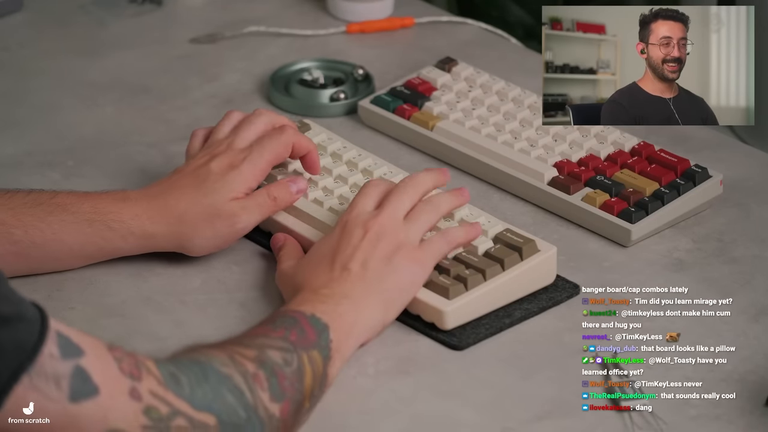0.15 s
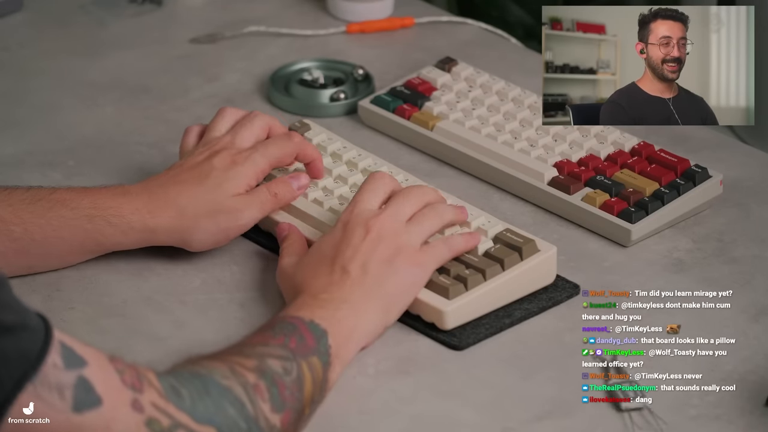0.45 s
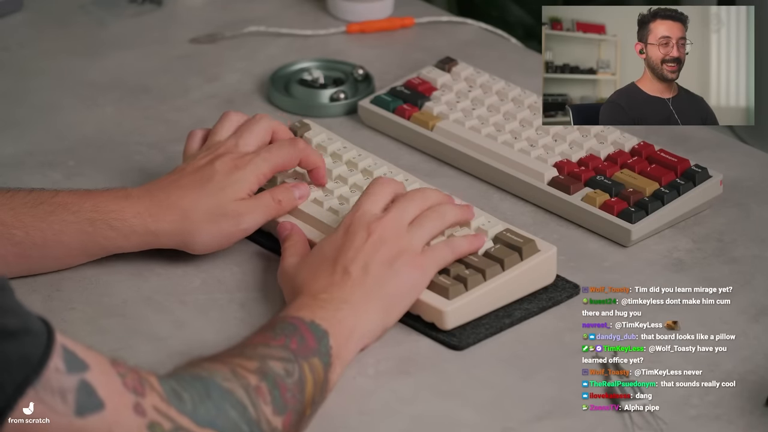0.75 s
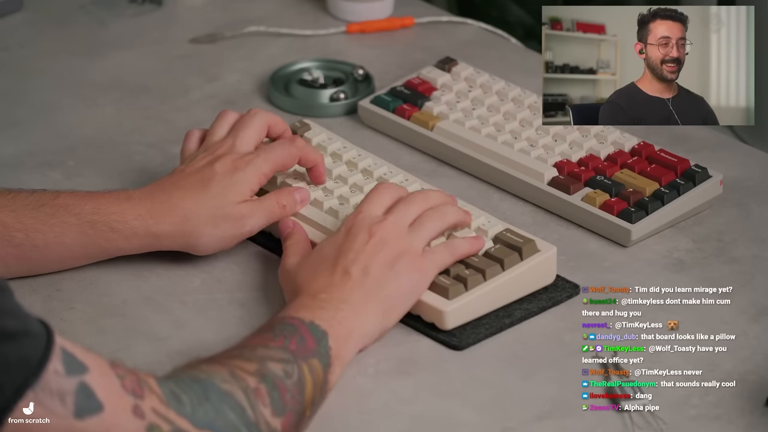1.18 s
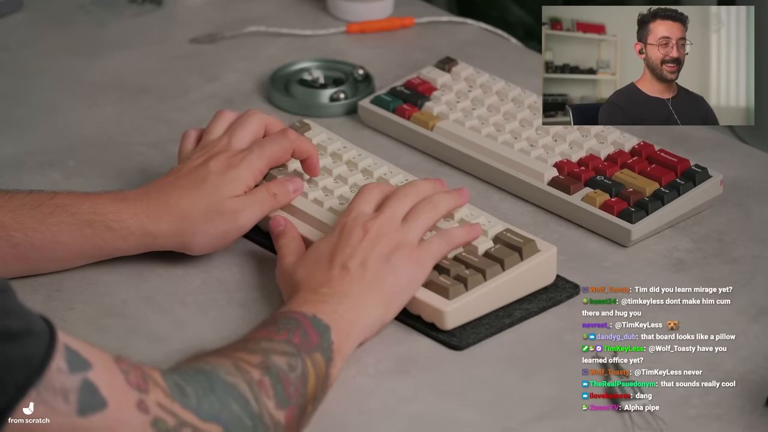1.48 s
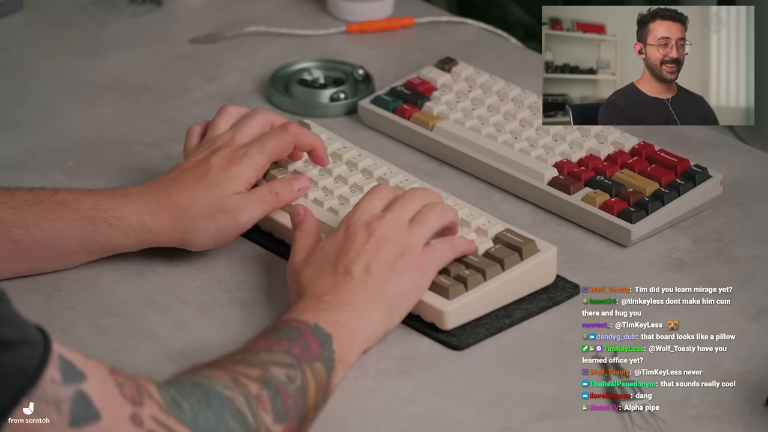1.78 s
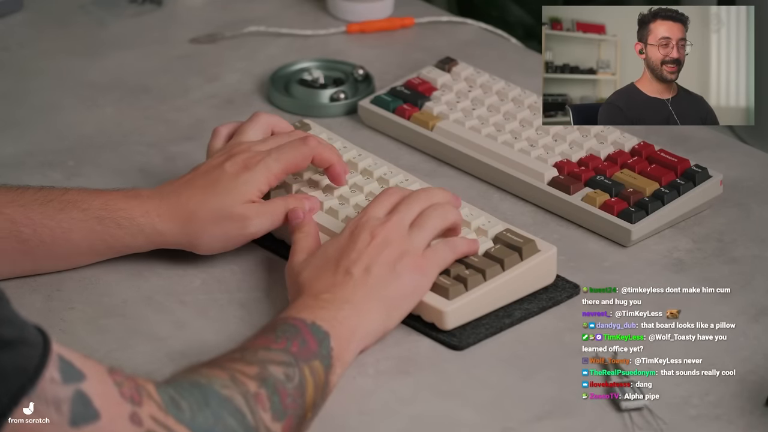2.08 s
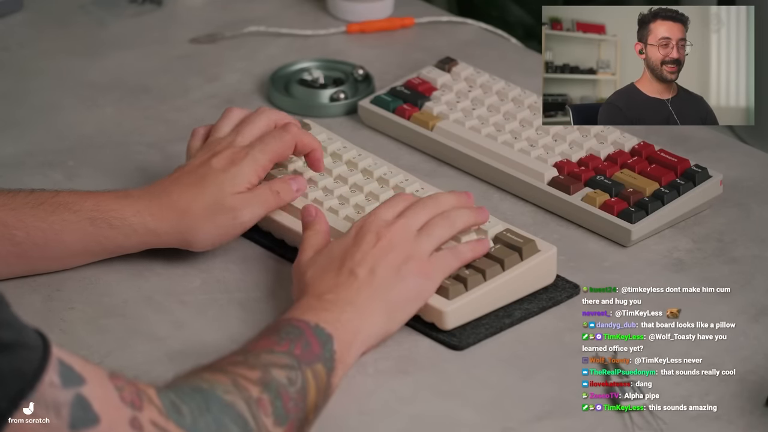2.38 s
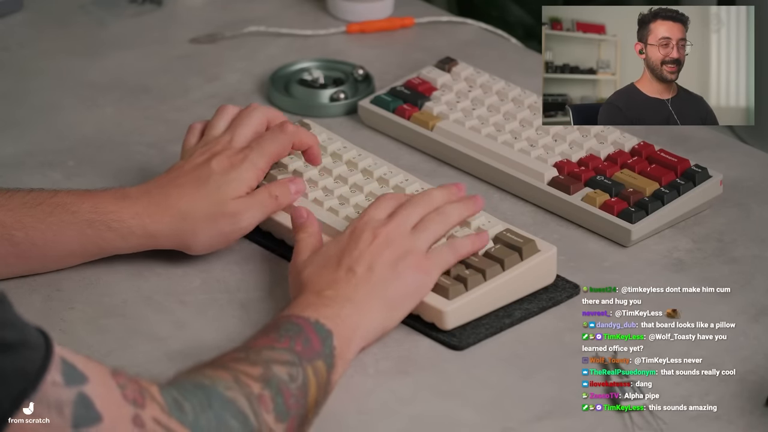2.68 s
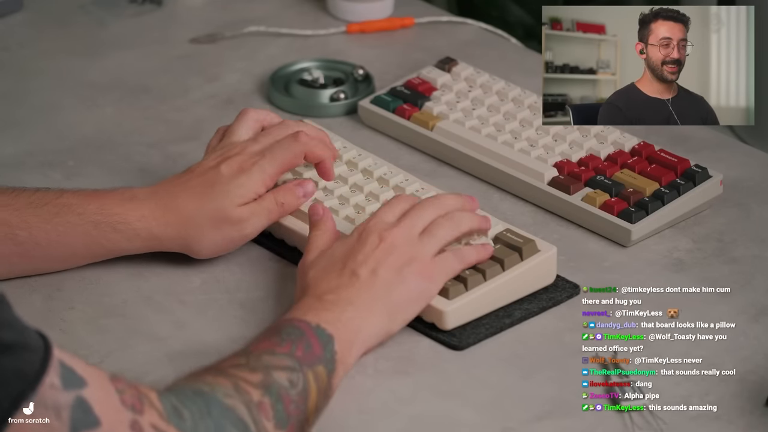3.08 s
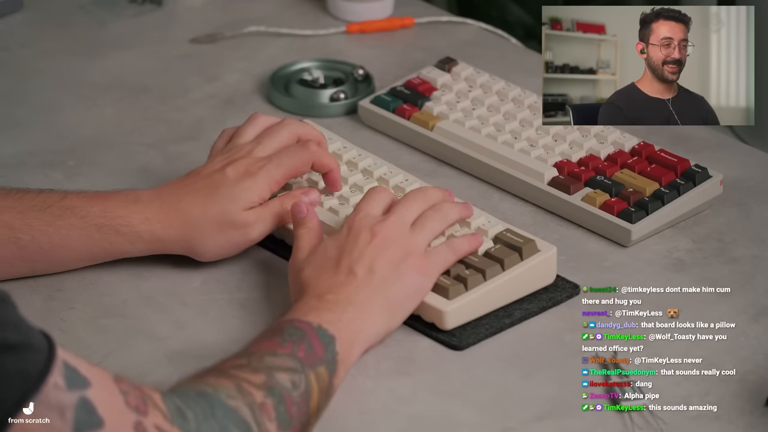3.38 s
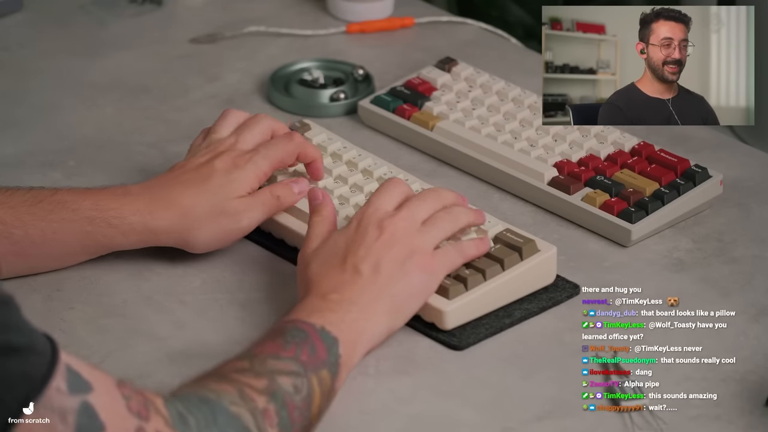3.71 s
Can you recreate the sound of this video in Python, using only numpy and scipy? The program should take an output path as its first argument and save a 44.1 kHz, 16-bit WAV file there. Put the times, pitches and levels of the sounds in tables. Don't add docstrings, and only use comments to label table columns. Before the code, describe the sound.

Mechanical keyboard typing runs from the start at about sixteen strokes a second, bright short clacks of varying strength. Deeper, longer spacebar thocks come every few tenths of a second, strong near 0.95, with low desk thumps beneath. Around 2.1-2.35 seconds it thins to faint ticks, then dense typing resumes until about 3.8. Close microphone, small hard room, short reverberation, quiet low ventilation rumble.

```python
import sys
import numpy as np
from scipy import signal
from scipy.io import wavfile

SR = 44100
rng = np.random.default_rng(int(sys.argv[2]) if len(sys.argv) > 2 else 0)


def magnitude_from_level(level_db):
    exponent = np.asarray(level_db, float) / 20
    return 10 ** exponent


def digitize_waveform(pressure):
    field = np.atleast_2d(pressure).T
    bounded = np.clip(field, -1, 1)
    quanta = np.round(bounded * 32767).astype(np.int16)
    wavfile.write(sys.argv[1], SR, quanta)


N = 169785


def at_hz(points, hz):
    table_hz, value = np.transpose(points)
    return np.interp(np.log(hz), np.log(table_hz), value)


def bands(length, gain):
    edges = 22 * 2 ** np.arange(0, 10, .5)
    white = rng.standard_normal((2, length + SR))
    total = 0
    for k, (low, high) in enumerate(zip(edges, edges[1:])):
        sos = signal.butter(2, [low, high], "band", fs=SR, output="sos")
        band = signal.sosfilt(sos, white[k % 2])[SR:]
        total = total + gain(np.sqrt(low * high)) * band
    return total


def blows(s, db, modes, scale_hz=1, seconds=.04, rise=.0005, spread_db=2.0, way=1):
    detune = .006
    t = np.arange(int(seconds * SR)) / SR
    luck = rng.standard_normal((len(s), 2, len(modes)))
    wave = 0
    for k, (hz, level, t60) in enumerate(modes):
        strength = magnitude_from_level(level + spread_db * luck[:, 0, k])
        pitch = hz * scale_hz * (1 + detune * spread_db * luck[:, 1, k])
        decay = magnitude_from_level(-60 * t / t60)
        wave = wave + strength[:, None] * decay * np.sin(2 * np.pi * pitch[:, None] * t)
    wave = wave * (1 - np.exp(-t / rise))
    wave = wave * (way * magnitude_from_level(db) / np.abs(wave).max(axis=1))[:, None]
    out = np.zeros(N + SR)
    start = (s * SR).astype(int)
    np.add.at(out, start[:, None] + np.arange(len(t)), wave)
    return out[:N]


def radiate(x, low_hz):
    return signal.sosfilt(signal.butter(4, low_hz, "high", fs=SR, output="sos"), x)


# (frequency [Hz], level [dB])
RUMBLE_SPECTRUM = [(25, -37), (55, -0.5), (90, -4.5), (200, -6), (370, -21.5), (800, -24.5), (3000, -26),
                   (15000, -46.5)]


def rumble():
    rumble_db = -55
    air = bands(N, lambda hz: magnitude_from_level(at_hz(RUMBLE_SPECTRUM, hz)))
    return magnitude_from_level(rumble_db) * air / np.std(air)


# (frequency [Hz], reverberation time [s])
ROOM_T60 = [(500, 0.49), (2000, 0.42), (5000, 0.28), (15000, 0.37)]
# (frequency [Hz], level [dB])
ROOM_COLOUR = [(500, 4), (1500, 2), (3000, 1), (4500, 4), (7000, 3.5), (10000, -2), (13000, -1.5),
               (16000, -6)]
# (delay [s], level [dB])
ECHOES = [(0.012, -18), (0.015, -22), (0.025, -32), (0.027, -25), (0.034, -34), (.0472, -26)]


def room(x):
    tail_db, tail_rise_s = -13.5, 0.0081
    smear_s, clean = .0012, 7.0
    t = np.arange(SR // 2) / SR
    tail = bands(len(t), lambda hz: magnitude_from_level(at_hz(ROOM_COLOUR, hz) - 60 * t / at_hz(ROOM_T60, hz)))
    tail = tail * (1 - np.exp(-(t / tail_rise_s) ** 3))
    response = magnitude_from_level(tail_db) * tail / np.sqrt(np.sum(tail ** 2))
    grit = rng.standard_normal(len(t)) * (rng.random(len(t)) < .1)
    for delay, db in ECHOES:
        puff = (t > delay) * np.exp(-np.abs(t - delay) / smear_s) * grit
        puff[int(delay * SR)] = clean
        response = response + magnitude_from_level(db) * puff / np.sqrt(np.sum(puff ** 2))
    return signal.fftconvolve(x, response)[:N]


# (frequency [Hz], level [dB], t60 [s])
DESK_MODES = [(119, 0, .4)]
# (time [s], strength [1/1000])
PUSHES = [(0.045, -10.5), (0.1501, -5.5), (0.206, 4.5), (0.2687, -8), (0.3309, -6), (0.4082, -5.5),
          (0.457, -3), (0.5131, -1.5), (0.5711, -4), (0.64, -0.7), (0.71, -5), (0.7685, -8), (0.8276, -5.5),
          (0.874, 2.5), (0.9292, 3.9), (0.9538, -12), (1.0327, -5.5), (1.09, 0), (1.152, -6.5),
          (1.2283, -10), (1.2801, -5), (1.3334, -4), (1.407, 1.6), (1.4743, -4), (1.5294, -0.2),
          (1.599, -5), (1.6618, -6), (1.719, -3), (1.7526, -2.2), (1.8163, 5.5), (1.8626, -6), (1.9337, 3),
          (1.995, -6), (2.1119, -10), (2.3688, 0), (2.4081, -6.1), (2.4873, -7.5), (2.5338, -6),
          (2.592, -0.6), (2.6568, -7.5), (2.7143, -1.5), (2.7816, -5.9), (2.8338, -7), (2.9114, -5.5),
          (2.94, 0.5), (2.9932, 1.8), (3.0261, -9.5), (3.1045, -2), (3.1548, 0.5), (3.169, -7),
          (3.2358, -4.5), (3.323, -6.5), (3.4389, -6.5), (3.496, 1), (3.5533, -4), (3.604, -7),
          (3.6687, -3), (3.73, -3.5), (3.7768, -0.5), (3.8074, -3.5)]


def desk():
    s, push = np.transpose(PUSHES)
    db, way = 20 * np.log10(np.abs(push) + .01), np.sign(push)
    hum = blows(s, db - 61, DESK_MODES, seconds=.5, rise=.002, way=way)
    upper_modes = [(184, -2.5, 0.13), (231.5, -6.5, 0.11)]
    upper = blows(s + 0.0012, db - 69, upper_modes, seconds=.2, rise=0.006, way=way)
    return hum + upper


# (frequency [Hz], level [dB], t60 [s])
CASE_MODES = [(200, -5, 0.058), (240, -3, 0.065), (278.6, -2.5, 0.084), (360, -4, 0.047),
              (438, -8.5, 0.049)]
# (time [s], peak level [dB], brightness [dB], case knock [dB])
BAR_STROKES = [(0.044, -16.5, -7, -3), (0.3306, -17, -12, -3.5), (0.7692, -16.5, -12.5, 0),
               (0.9545, -13.5, -6, 1.5), (1.2286, -15, -10, -0.5), (1.661, -17, -10, -1),
               (2.1115, -18, -10.5, -3), (2.4875, -16, -12, -4.5), (2.8346, -17, -14.5, -2.5),
               (3.0269, -16, -8, -1), (3.323, -16, -9, -1.5), (3.6052, -16, -14.5, -2)]


def case_knock():
    strokes = np.array(BAR_STROKES)
    return blows(strokes[:, 0], strokes[:, 3] - 41, CASE_MODES, seconds=0.089, rise=0.0018)


# (multiple of pitch [1], level [dB], t60 [s])
STEM_MODES = [(1.05, 1.5, 0.0029), (.88, -6.5, 0.0028), (.68, -4.5, 0.003), (1.12, -4.5, 0.0021),
              (1.25, -6, 0.0019)]
STEM_DB = -1
# (frequency [Hz], level [dB], t60 [s])
SNAP_MODES = [(14150, 0, 0.0013), (15800, -1, 0.0011)]
# (frequency [Hz], level [dB], t60 [s])
BAR_MODES = [(986, -14, 0.022), (1202, -13, 0.017), (1364, -2.5, 0.02), (1478, -4.5, 0.017),
             (1716, 4.5, 0.017), (1854, 3, 0.013), (2240, -4, 0.009), (2440, -7, 0.0081),
             (2950, -7.5, 0.014), (3454, -5, .013), (3740, -10, .013), (3874, -11, 0.019), (4256, -5, .016),
             (4840, -3.5, 0.015)]


def bar():
    s, db, bright, _ = np.transpose(BAR_STROKES)
    crack = blows(s, db + 0.93, [(2700, 0, 0.0013)], rise=0.00021)
    snap = blows(s, db - 20.5, SNAP_MODES)
    ring = blows(s, db - 6, BAR_MODES, rise=0.0022, spread_db=1.64)
    stem = blows(s, db + bright + STEM_DB, STEM_MODES, 6930, rise=.0001)
    return crack + snap + ring + stem


# (multiple of pitch [1], level [dB], t60 [s])
CAP_MODES = [(1.03, 5.5, 0.0052), (1.14, -8.5, 0.0027), (.88, -5, 0.0067), (1.27, -9, 0.0035),
             (1.47, -14, 0.0067)]
# (frequency [Hz], level [dB], t60 [s])
PLATE_MODES = [(871, -2, 0.0094), (1213, -8.5, 0.012), (1780, -6, 0.018), (4700, 5, 0.0074)]


def strike_caps(s, db, cap_hz, bright, stem_hz):
    hit = blows(s, db - 0.27, CAP_MODES, cap_hz)
    hit = hit + blows(s, db + bright + STEM_DB, STEM_MODES, stem_hz, rise=0.00076)
    hit = hit + blows(s, db - 16, PLATE_MODES, spread_db=6.0)
    hit = hit + blows(s, db - 15.5, SNAP_MODES, rise=0.00019)
    late = s + .0017 * rng.uniform(0.65, 1.438, len(s))
    again = db - 2 + .9 * bright
    rebound = blows(late, again, CAP_MODES, cap_hz)
    rebound = rebound + blows(late, again + bright + STEM_DB, STEM_MODES, stem_hz, rise=0.0013)
    return hit + rebound


# (time [s], peak level [dB], brightness [dB])
TICKS = [(0.128, -44, -13), (0.196, -51, 1), (1.5834, -36, -13), (2.2625, -50, 0), (2.279, -60, 1),
         (2.8957, -46, 2), (3.222, -48, 2), (0.3581, -23.5, -27), (0.5583, -38.5, -5), (0.5825, -33, -19),
         (0.587, -26, -29), (0.695, -32, -26), (0.9823, -23, -19), (1.135, -30, -15), (1.2485, -29, -20),
         (1.8553, -23, -7.5), (2.083, -29.5, -14), (2.1507, -27.5, -10), (2.2914, -26, -16.5),
         (2.3316, -40, -15.3), (2.3641, -30, -7.5), (2.5066, -27.0, -14), (2.6961, -28, -22.9),
         (2.768, -32, -11), (2.8592, -27.5, -24), (3.0457, -21, -15), (3.1574, -25, -33),
         (3.273, -30.1, -51), (3.3065, -30, -19), (3.4216, -41.5, -8), (3.6325, -25, -7),
         (3.8277, -23.5, -31)]


def ticks():
    s, db, bright = np.transpose(TICKS)
    return strike_caps(s, db, np.full(len(s), 2700), bright, np.full(len(s), 9500))


# (time [s], peak level [dB], cap pitch [Hz], brightness [dB], stem pitch [Hz])
LETTER_STROKES = [(0.1494, -18, 2800, -12.5, 8250), (0.2053, -20, 2790, -3, 8420),
                  (0.2673, -12.0, 2480, -12.5, 9330), (0.4084, -14.5, 2750, -10.5, 8530.0),
                  (0.458, -14.9, 2740, -11.5, 9100), (0.5134, -23, 2715, -4, 8950),
                  (0.5712, -14.5, 2690, -8.2, 7500), (0.6391, -20.5, 2700.0, -1.5, 9150),
                  (0.7108, -14, 2560, -11.5, 9570), (0.8289, -14, 2810, -10, 9340),
                  (0.874, -15, 2710, -14.5, 9200), (0.9298, -21.5, 2740, -10, 9630.0),
                  (1.0324, -16, 2700, -7, 7280), (1.09, -23.5, 2610.0, -1.3, 9170),
                  (1.151, -13, 2600, -11.5, 9450), (1.2811, -15.5, 2770, -11.5, 9400),
                  (1.3348, -17, 2720, -13.5, 8900), (1.4066, -18.5, 2860, -7, 9630),
                  (1.4736, -15.5, 2840, -10.5, 8100), (1.5296, -22.5, 2600, -3.5, 8700),
                  (1.599, -12.5, 2460, -11.5, 9540), (1.719, -15.5, 2820, -11.5, 9370),
                  (1.7537, -15.5, 2700, -11.5, 8750), (1.8164, -20.5, 2850.0, -3.3, 9400),
                  (1.8627, -13, 2750, -10, 7760), (1.9333, -22.5, 2680, -3.5, 9040),
                  (1.9946, -13, 2555, -11, 9400),
                  (2.3548, -24.0, 2700, -16.2, 8500), (2.367, -18.5, 2950.0, -15, 8550),
             (2.4067, -10, 2680, -14, 7700), (2.5345, -14.5, 2850, -11.5, 8700),
             (2.592, -14, 2690, -12, 8800), (2.6438, -21.5, 3020, -4.5, 8500),
             (2.6554, -15.0, 2750, -8.3, 7200), (2.7126, -20, 2530, -3, 8880),
             (2.7803, -12.5, 2540, -11.5, 9580), (2.9109, -15, 2770, -11.5, 9240),
             (2.94, -12.9, 2720, -13, 9100), (2.9924, -20.5, 2850, -5, 8500),
             (3.039, -16.5, 2730.0, -11, 9330), (3.1046, -16, 2570, -7.5, 9340),
             (3.1552, -26, 2800, -31, 9100), (3.169, -10, 2670, -13.5, 7300),
             (3.2365, -18.5, 2500, -10.5, 9770), (3.4393, -15, 2700.0, -8, 7000),
             (3.4963, -20.5, 2560, -3.7, 9000), (3.5528, -12.5, 2560, -10.5, 10000),
             (3.6678, -13.5, 2800, -11.5, 8400), (3.73, -15, 2700.0, -14.5, 8750),
             (3.7768, -20, 2950.0, -8.5, 8100), (3.8078, -16.5, 2700, -10.5, 9100.0)]


def letter_keys():
    return strike_caps(*np.transpose(LETTER_STROKES))


def scene():
    clack = radiate(letter_keys() + ticks(), 1144) + radiate(bar(), 803)
    return (rumble() + room(clack) + desk() + case_knock() + clack)[None]


def top_cut(x):
    return signal.sosfilt(signal.butter(12, 17020, fs=SR, output="sos"), x)


def record(dry):
    top_hz = 16260
    low_pass = signal.cheby2(14, 50, top_hz * 1.02, fs=SR, output="sos")
    mix = signal.sosfilt(low_pass, dry)
    return top_cut(mix)


dry = scene()
out = record(dry)
digitize_waveform(out)
```